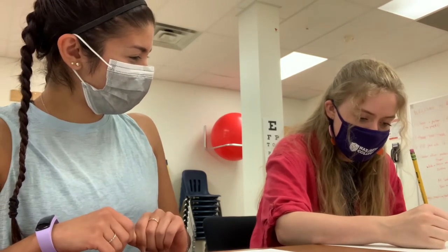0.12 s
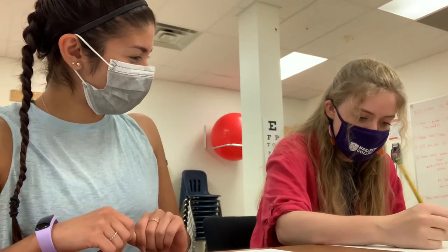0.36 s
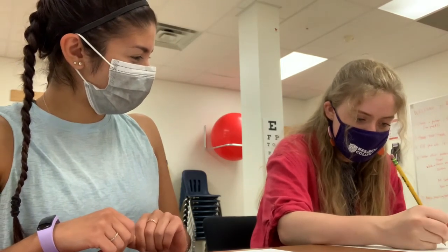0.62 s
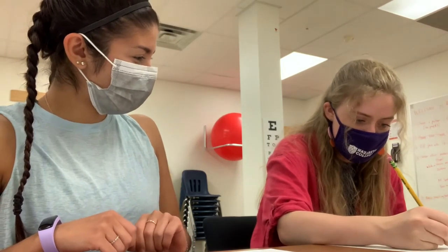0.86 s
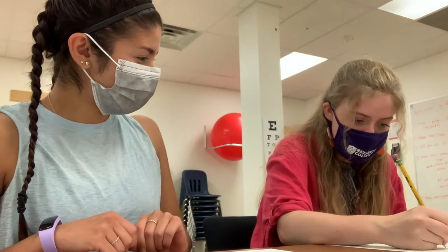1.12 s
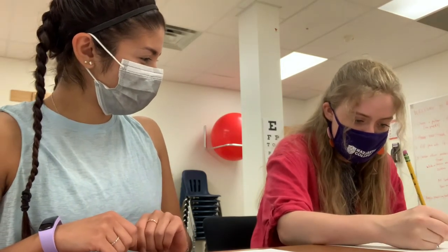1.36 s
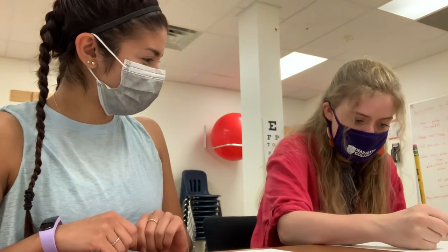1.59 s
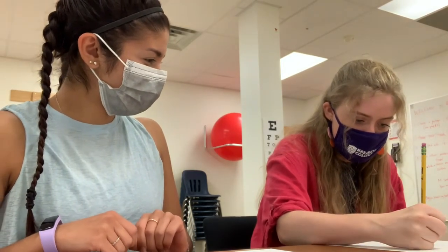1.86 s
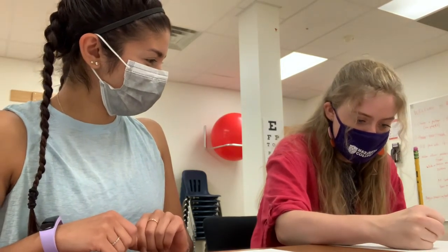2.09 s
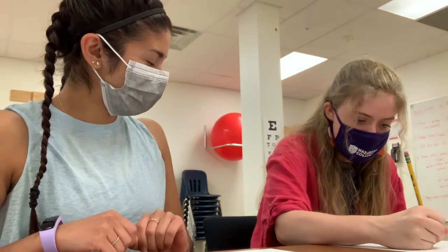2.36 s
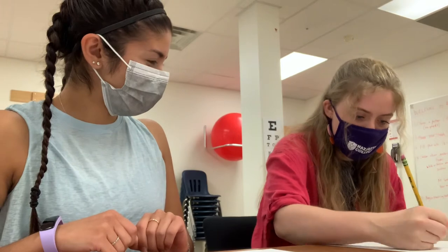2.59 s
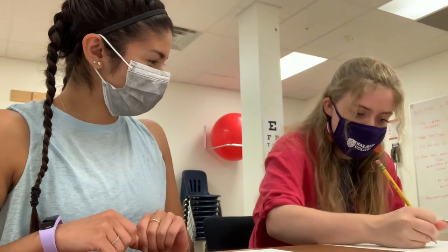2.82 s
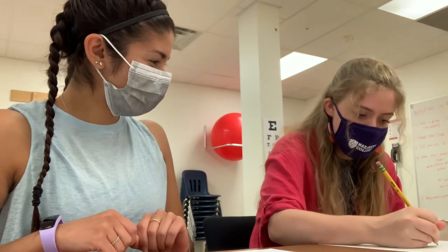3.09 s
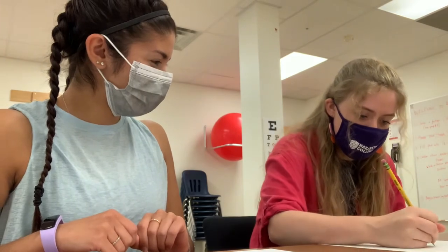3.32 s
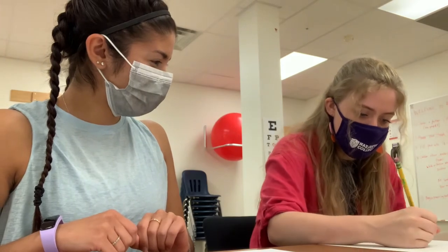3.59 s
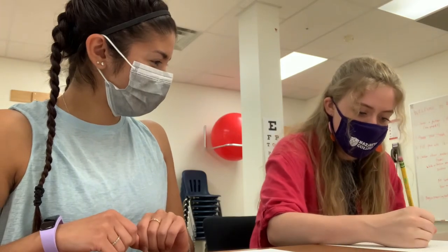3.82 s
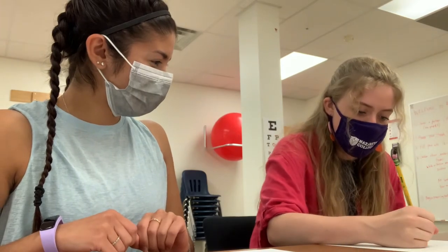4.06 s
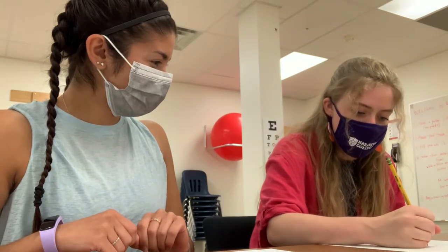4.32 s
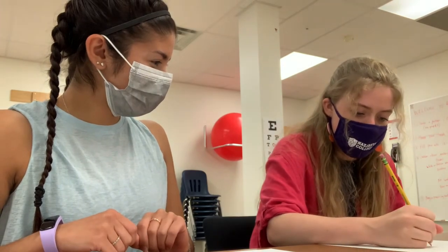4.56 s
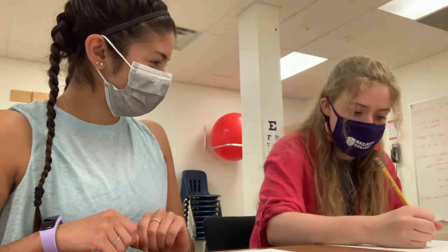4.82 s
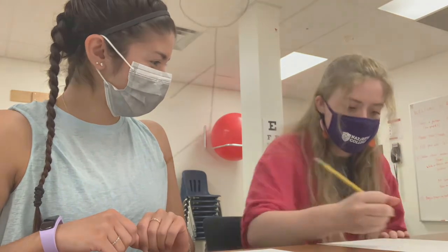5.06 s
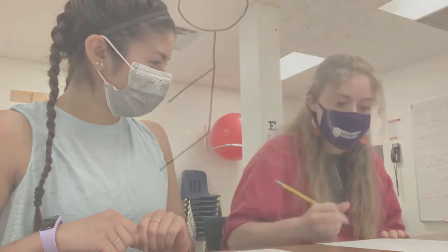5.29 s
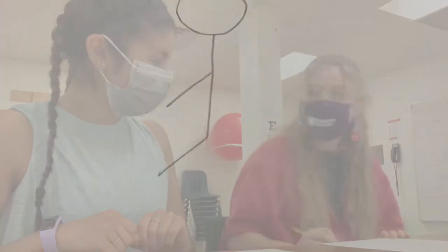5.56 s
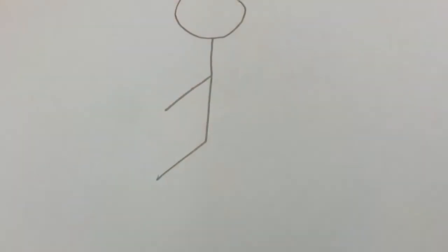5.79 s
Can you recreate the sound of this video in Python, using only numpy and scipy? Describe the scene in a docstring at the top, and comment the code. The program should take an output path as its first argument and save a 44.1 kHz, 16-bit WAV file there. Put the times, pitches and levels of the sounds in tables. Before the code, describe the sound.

A pencil rubs softly on paper in a quiet classroom while a low ventilation hum and airy rush run throughout, then fade away.

```python
"""A classroom desk, two microphone ports near the sheet; a ventilation motor hums under rushing air throughout.
From the start a pencil rubs slow lines on the paper, with a quick hiss at 0.4 s and two more at 2.5 s.
The point taps the sheet twice past 2 s and again at 4.9 s, between two last flicks. From 4.8 s all fades out;
a tiny bright click at 5.7 s is nearly lost in the fade. Strokes are trains of random catches sent through
resonances of paper and desk; the motor is a stack of sines; the air is patchy noise under a noise suppressor."""
import sys
import numpy as np
from scipy import signal
from scipy.fft import rfft, irfft, next_fast_len
from scipy.io import wavfile
from scipy.ndimage import uniform_filter1d, map_coordinates

SR = 44100
rng = np.random.default_rng(int(sys.argv[2]) if len(sys.argv) > 2 else 0)


def amplitude_ratio(level_db):
    """Convert a level in decibels to the matching linear amplitude (field) ratio."""
    exponent = np.asarray(level_db, float) / 20
    return 10 ** exponent


def dump(signal):
    """Clip the signal to [-1, 1] and save it as 16-bit WAV at the path in sys.argv[1]."""
    limited = np.clip(np.atleast_2d(signal).T, -1, 1)
    pcm = np.round(limited * 32767).astype(np.int16)
    wavfile.write(sys.argv[1], SR, pcm)


N = 261072  # length in samples

# Slow pencil strokes. Each row: start in seconds, crest in seconds, end in seconds,
# rub in relative dB, scratch in relative dB.
SLOW_STROKES = [(.03, .13, .21, -74, -90), (.92, 1.15, 1.5, -82.5, -89.5), (1.3, 1.6, 1.8, -77, -90),
                (1.83, 1.97, 2.12, -73, -92), (2.0, 2.17, 2.225, -66.5, -88.5),
                (2.205, 2.26, 2.41, -66.5, -87), (2.39, 2.435, 2.47, -78, -88),
                (2.76, 2.82, 2.92, -87.5, -89), (3.18, 3.4, 3.55, -80, -82.5),
                (3.42, 3.56, 3.72, -74.5, -84.5), (3.81, 3.96, 4.1, -77, -90.5),
                (4.0, 4.22, 4.33, -74, -86.5), (4.28, 4.36, 4.46, -72, -90), (4.4, 4.53, 4.63, -79.5, -90)]
# Quick pencil flicks. Each row: start in seconds, crest in seconds, end in seconds,
# rub in relative dB, scratch in relative dB.
QUICK_FLICKS = [(.362, .425, .472, -74.5, -67.5), (2.5, 2.56, 2.6, -76.5, -86.5),
                (2.575, 2.603, 2.622, -71.5, -76), (4.848, 4.862, 4.895, -80, -79.5),
                (4.898, 4.915, 4.97, -69, -77.5)]
# The point taps the sheet. Each row: time in seconds, relative level in dB.
POINT_TAPS = [(2.221, -69), (2.432, -73), (4.909, -66)]
# Resonances of paper on the desk top. Each row: centre in Hz, width in Hz,
# relative gain in a slow stroke in dB, relative gain in a flick in dB.
DESK_MODES = [(790, 100, -1, -5.5), (1046, 110, -5.5, -10), (1248, 120, -7.5, -0.5), (1437, 150, -7, 0),
              (1576, 90, -0.5, -8.5), (1671, 90, -0.5, -11.5), (1933, 80, -9.5, -4),
              (2093, 110, -9.5, -15.5)]
# Colour of graphite on fibres. Each row: frequency in Hz, relative gain in a slow stroke in dB,
# relative gain in a flick in dB.
FIBRE_COLOUR = [(2500, -20.5, -10), (5400, -15, -10.5), (7700, -11, -4), (8500, -7, -2.5),
                (9200, 4.5, -3.5), (9400, -1.5, 2), (12700, -5, -2), (14400, -11, -10),
                (16000, -21.5, -18.5)]
# Ring of the click. Each row: frequency in Hz, relative level in dB, time to fall 60 dB in seconds.
CLICK_RING = [(4500, 0, .012), (10900, -1, 0.0093)]
# Motor speed. Each row: time in seconds, turns per second in Hz.
MOTOR_SPEED = [(0, 57.42), (2, 57.44), (2.6, 57.5), (6, 57.56)]
# Strong motor orders that swell once. Each row: multiple of the speed, relative level at the crest in dB,
# crest in seconds, fall away from the crest in dB per second.
STRONG_ORDERS = [(1, -42, 3.3, 0.24), (3, -53.5, 1.3, 1.52), (4, -58, 1.9, 1.76), (5, -64, 4, 0.6)]
# Weak steady motor orders. Each row: multiple of the speed, relative level in dB.
WEAK_ORDERS = [(6.27, -77.5), (7, -76.5), (8, -75.5), (14, -86)]
# Thin tones far above the hum. Each row: frequency in Hz, relative level in dB.
WHINES = [(4745, -104), (5327, -102)]
# Orders whose standing wave has a node between the ports. Each row: multiple of the speed, level in dB.
OPPOSED_ORDERS = [(2, -61), (6, -71)]
# Duct rumble before the suppressor. Each row: frequency in Hz, density in dB per Hz.
DUCT_RUMBLE = [(25, -100), (40, -78), (65, -74.5), (100, -73.5), (150, -76), (200, -78), (320, -84),
               (450, -88.5), (700, -94.5), (1000, -100), (1450, -107), (1800, -121), (3000, -135)]
# Hiss of far vents before the suppressor. Each row: frequency in Hz, density in dB per Hz.
VENT_HISS = [(800, -125), (1500, -116), (2000, -117), (3000, -116), (4000, -120), (5000, -120),
             (6200, -124), (7000, -126), (9000, -140)]
# Microphone self-noise before the suppressor. Each row: frequency in Hz, density in dB per Hz.
TOP_SHEEN = [(5000, -140), (7000, -126), (10000, -123), (13000, -126), (14500, -131), (15600, -145)]
# Dips where a noise suppressor turns the hiss down. Each row: start in seconds, length in seconds,
# change in dB.
SUPPRESSOR_DIPS = [(2.025, 0.036, -6), (2.462, .05, -5.5), (2.638, 0.17, -6), (2.92, .06, -6.5),
                   (3.038, .15, -3), (4.07, .18, -3.5), (4.638, .27, -5.5), (5.248, .17, -3.5)]
# Correlation of left and right. Each row: frequency in Hz, correlation.
LEFT_RIGHT_CORRELATION = [(60, 0.88), (130, 0.77), (300, 0.77), (600, 0.45), (1500, .55), (2200, 0.23),
                          (6000, 0.2), (7500, 0.77), (9000, 0.99), (11000, 0.82), (13500, 0.98),
                          (16000, 0.91)]
# Phase between the ports. Each row: frequency in Hz, lead of the left port in radians.
PORT_LEAD = [(30, -.3), (58, -.3), (115, -.8), (170, -.15), (340, -.7), (780, -3.6), (1380, -5.2),
             (1720, -5.2), (2930, -11), (3700, -12.2), (4740, -15.6), (5300, -15), (6460, -10.8),
             (7580, -10), (9000, -9.42), (10200, -9.1), (12600, -7), (13600, -6.28), (16000, -6.28)]
# Level between the ports. Each row: frequency in Hz, left minus right in dB.
PORT_TILT = [(58, 3.5), (110, -7), (170, -1.5), (235, -2.5), (290, 1), (400, -2.5), (700, -7), (1000, -3),
             (1430, -2.5), (1650, -3), (1920, -7), (2080, -0.5), (2400, -7), (3200, -4.5), (4400, -2.5),
             (8000, -0.5)]
# The closing fade: start in seconds, end in seconds.
FADE_SPAN = (4.77, 5.808)


def unit(x):
    """Scale x to rms 1."""
    return x / np.sqrt(np.mean(x ** 2) + 1e-20)


def along(points, hz):
    """Read (Hz, value) points on a log frequency axis."""
    f, value = np.transpose(points)
    return np.interp(np.log(hz + 1), np.log(f + 1), value)


def wobble(rate):
    """A smooth random curve with rate knots a second."""
    knots = rng.standard_normal(int(N * rate / SR) + 4)
    return map_coordinates(knots, [np.arange(N) * rate / SR])


def filtered(x, response):
    """Multiply the spectrum of x by a complex response of frequency."""
    m = next_fast_len(N + SR // 2)
    return irfft(rfft(x, m) * response(np.fft.rfftfreq(m, 1 / SR)), m)[..., :N]


def pencil():
    """Catches ring paper and desk, finer ones scratch; haste shifts the colour from slow stroke to flick."""
    rest_db = [[-98], [-97.5]]  # rub and scratch of the hand shifting on the sheet between strokes
    slow = pressure(SLOW_STROKES) + amplitude_ratio(rest_db) ** 2
    quick = pressure(QUICK_FLICKS)
    rub_gain, scratch_gain = np.sqrt(slow + quick)
    haste = 0.83 * quick[1] / (slow + quick)[1]  # share of the flick colour

    def blend(catches, body):
        """Cross from the slow colour to the flick colour."""
        slow_sound, flick_sound = filtered(catches[:, None], body).swapaxes(0, 1)
        return (1 - haste) * unit(slow_sound) + haste * unit(flick_sound)

    rub = blend(slips(5000, spread_db=2.5), padded_desk) * rub_gain * amplitude_ratio(3 * wobble(38))
    scratch = blend(slips(8100, spread_db=1.0), fibres) * scratch_gain * amplitude_ratio(1.1 * wobble(40))
    # Shared and opposed gains: a near source is more alike at both ports than the room.
    return (rub + taps()) * [[1.42], [.6]] + scratch * [[1.6], [1.55]]


def pressure(strokes):
    """Power of rub and scratch: each stroke swells to a rounded crest and eases off."""
    edge_db, squareness = 14, 2.5  # start and end under the crest; higher = flatter crest, more sudden ends
    t, power = np.arange(N) / SR, 0
    for start, crest, end, *crest_db in strokes:
        away = abs(t - crest) / np.where(t < crest, crest - start, end - crest)
        drop_db = np.minimum(edge_db * away ** squareness, 99)
        power = power + amplitude_ratio(np.array(crest_db)[:, None] - drop_db) ** 2
    return power


def slips(rate, spread_db):
    """Two trains of tiny catches of the point on paper fibres, on average rate a second in each."""
    hit = rng.random((2, N)) < rate / SR
    strength = amplitude_ratio(spread_db * rng.exponential(size=(2, N)))
    return hit * strength * rng.standard_normal((2, N))


def desk_top(f):
    """Resonances of paper on the desk, in alternating sign, for a slow stroke and for a flick."""
    slow, flick = 0, 0
    for k, (centre, width, slow_db, flick_db) in enumerate(DESK_MODES):
        mode = (-1) ** k * 1j * f * width / (centre ** 2 - f * f + 1j * f * width)
        slow = slow + amplitude_ratio(slow_db) * mode
        flick = flick + amplitude_ratio(flick_db) * mode
    return np.array([slow, flick])


def padded_desk(f):
    """The desk through a padded contact, which passes little treble above 2300 Hz."""
    return desk_top(f) / (1 + 1j * f / 2300) ** 3


def fibres(f):
    """Bright colour of graphite on fibres, for a slow stroke and for a flick."""
    colour = np.array(FIBRE_COLOUR)
    return np.array([amplitude_ratio(along(colour[:, [0, column]], f)) for column in (1, 2)])


def taps():
    """The point taps the sheet: noise puffs that fall 60 dB in 15 ms ring the desk and fibres."""
    puffs, t = np.zeros((2, N)), np.arange(SR // 50) / SR
    for start, db in POINT_TAPS:
        first = round(start * SR)
        puffs[:, first:first + len(t)] += amplitude_ratio(db - 60 * t / .015) * rng.standard_normal((2, len(t)))
    return filtered(puffs, lambda f: desk_top(f)[1] + amplitude_ratio(-5) * fibres(f)[1])


def click():
    """Something small and hard rings for a few milliseconds as decaying sines."""
    start_s, level_db = 5.6725, -55
    t = np.clip(np.arange(N) / SR - start_s, 0, None)
    ring = 0
    for hz, db, t60 in CLICK_RING:
        ring = ring + amplitude_ratio(level_db + db - 60 * np.minimum(t / t60, 3)) * np.sin(2 * np.pi * hz * t)
    return ring * [[1], [.3]]  # shared and opposed parts


def motor_turns():
    """Turns of the motor so far, the running sum of its speed."""
    s, hz = np.transpose(MOTOR_SPEED)
    return np.cumsum(np.interp(np.arange(N) / SR, s, hz)) / SR


def motor():
    """Orders of the motor's turning, each throbbing a little; two thin whines ride far above."""
    t, turns = np.arange(N) / SR, motor_turns()
    # An uneven beat of the fan against the duct, around 8.6 Hz.
    beat = np.sin(2 * np.pi * np.cumsum(8.6 + 1.61 * wobble(2.7)) / SR)
    orders = list(WEAK_ORDERS)
    for k, crest_db, crest, sag in STRONG_ORDERS:
        orders.append((k, crest_db - sag * abs(t - crest) + .5 * wobble(2)))
    hum = 0
    for k, db in orders:
        throb = amplitude_ratio(db + 1.6 * beat / k + 0.2 * wobble(11))
        cycles = k * turns + rng.random() + .006 * k * wobble(5.6)
        hum = hum + 1.688 * throb * np.sin(2 * np.pi * cycles)
    for hz, db in WHINES:
        cycles = hz * t + 0.17 * wobble(8)
        hum = hum + amplitude_ratio(db + 2.5 * wobble(4.4)) * np.sin(2 * np.pi * cycles)
    return np.array([hum, 0 * hum])  # no opposed part


def across():
    """Motor orders that push one port while they pull the other."""
    turns, hum = motor_turns(), 0
    for k, db in OPPOSED_ORDERS:
        sine = np.sqrt(2) * np.sin(2 * np.pi * (k * turns + rng.random()))
        hum = hum + amplitude_ratio(db + 1.2 * wobble(6)) * sine
    return hum * [[1], [-1]]


def air():
    """Duct rumble, far vent hiss and a smooth top sheen: shaped noises, the hiss most turned down in the dips."""
    gain_db = suppressor()
    rumble = amplitude_ratio(0.46 * gain_db + 0.43 * wobble(6.7)) * coloured(patchy(depth_db=1.37), DUCT_RUMBLE)
    hiss = amplitude_ratio(gain_db + 0.55 * wobble(15)) * coloured(patchy(depth_db=1.1), VENT_HISS)
    sheen = amplitude_ratio(0.23 * gain_db) * coloured(patchy(depth_db=0.2), TOP_SHEEN)
    return rumble + hiss + sheen


def suppressor():
    """Gain in dB of a noise suppressor that turns the hiss down at set times, with soft edges."""
    edge_s, gain_db = 0.043, .5  # time for a dip to set in or lift; gain between dips
    t = np.arange(N) / SR
    for start, length, db in SUPPRESSOR_DIPS:
        inside = np.minimum(t - start, start + length - t)
        gain_db = gain_db + db * np.clip(inside / edge_s + .5, 0, 1)
    return gain_db


def patchy(depth_db):
    """Two white noises that share patches of random gain in time and frequency."""
    z = signal.stft(rng.standard_normal((2, N)), nperseg=512)[2]
    field = uniform_filter1d(rng.standard_normal(z.shape[1:]), 6, 0)
    field = uniform_filter1d(field, 10, 1)
    noise = signal.istft(z * amplitude_ratio(depth_db * unit(field)), nperseg=512)[1]
    return unit(noise[:, :N])


def coloured(pair, spectrum):
    """Bring white noise of rms 1 to a density in dB per Hz."""
    return filtered(pair, lambda hz: amplitude_ratio(along(spectrum, hz)) * np.sqrt(SR / 2))


def ports(pair):
    """A shared and an opposed part become left and right, with the phase and tilt between the ports."""
    def share(hz):
        """Gains of the shared and opposed parts; equally strong parts come out at the table's correlation."""
        angle = np.arccos(np.clip(along(LEFT_RIGHT_CORRELATION, hz), 0, 1)) / 2
        return np.array([np.cos(angle), np.sin(angle)])

    def offset(hz):
        """Half of the level and phase difference goes to each port."""
        half = np.array([[.5], [-.5]])
        return amplitude_ratio(half * along(PORT_TILT, hz)) * np.exp(1j * half * along(PORT_LEAD, hz))

    mid, side = filtered(pair, share)
    return filtered(np.array([mid + side, mid - side]), offset)


def scene():
    """Desk and room as the two ports hear them."""
    return ports(pencil() + click() + motor() + air()) + across()


def roll_off(x):
    """The treble ends steeply here."""
    return signal.sosfilt(signal.butter(12, 15600, fs=SR, output="sos"), x)


def record(dry):
    """The finished mix: the scene with a nearly straight fade to silence."""
    start, end = FADE_SPAN
    fade = np.clip((end - np.arange(N) / SR) / (end - start), 0, 1) ** 1.006
    return roll_off(dry * fade)


dry = scene()
out = record(dry)
dump(out)
```